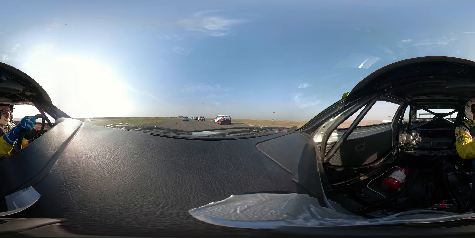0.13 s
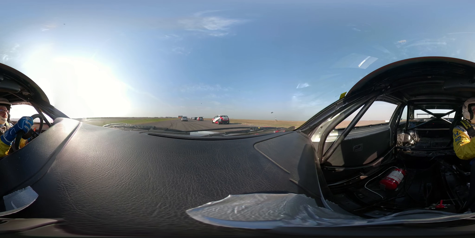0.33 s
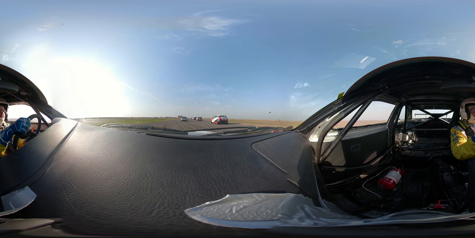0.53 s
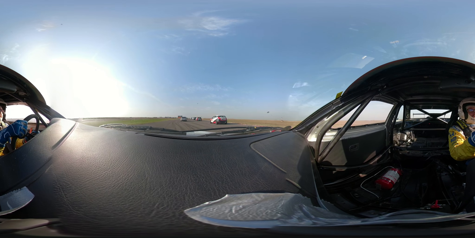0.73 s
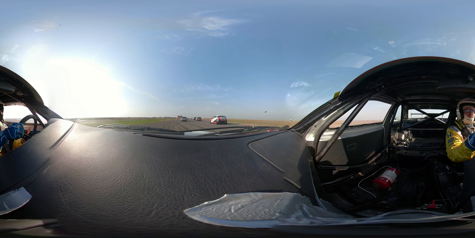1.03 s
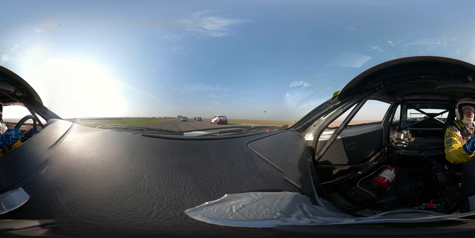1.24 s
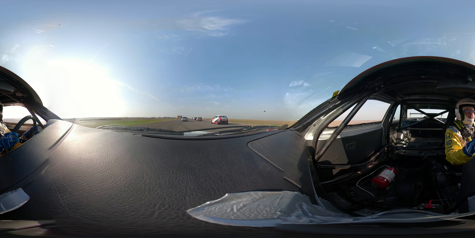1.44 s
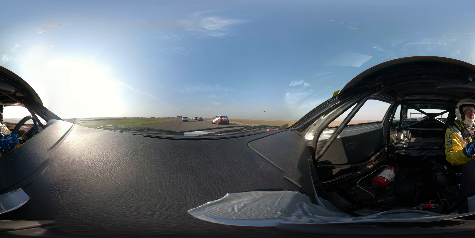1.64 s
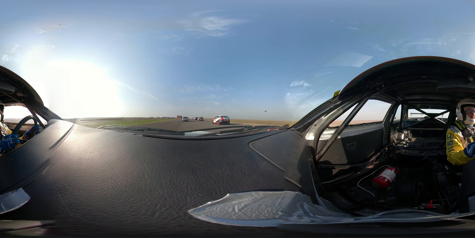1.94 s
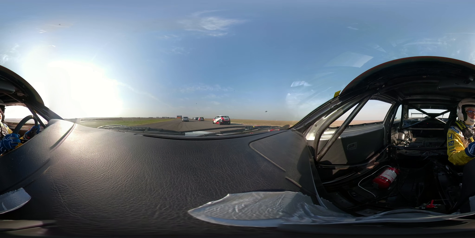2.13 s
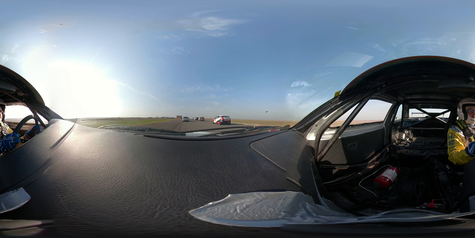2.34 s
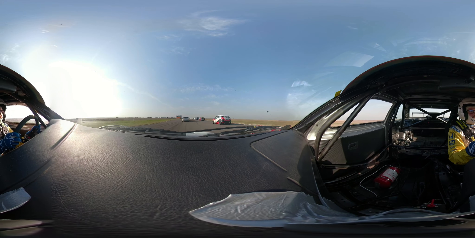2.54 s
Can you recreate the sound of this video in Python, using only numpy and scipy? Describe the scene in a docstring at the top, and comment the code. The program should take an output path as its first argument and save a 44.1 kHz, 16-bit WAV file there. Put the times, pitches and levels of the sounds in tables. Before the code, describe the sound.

Close in-car sound on a race track: a hard-working engine rises gradually in pitch with hissing intake and metallic valve clatter, then turns duller off throttle before picking up again, over low road and wind rumble.

```python
"""Inside a race car. After a short silence the sound fades in on a six-cylinder engine under load.
Its firing rate first dips, then climbs; the throttle lifts at 2 s and returns at 2.4 s.
The engine is tones at firing and cycle orders, combustion noise, valve clatter and intake hiss;
overtones, uneven orders and combustion noise sweep through fixed cabin resonances.
Shaped noise makes the road and wind rumble throughout; three decaying sines make chassis thuds."""
import sys
import numpy as np
from scipy import signal
from scipy.fft import rfft, irfft, next_fast_len
from scipy.io import wavfile
from scipy.ndimage import uniform_filter1d, map_coordinates

SR = 44100
rng = np.random.default_rng(int(sys.argv[2]) if len(sys.argv) > 2 else 0)


def boost(x):
    """Linear amplitude factor 10**(x/20) for a level x in decibels (scalar or array-like)."""
    u = np.asarray(x, float) / 20
    return 10 ** u


def output_pcm(signal):
    """Save a mono or channel-first signal as 16-bit PCM at the path in sys.argv[1].

    Samples are clipped to [-1, 1] before scaling.
    """
    pcm = np.clip(np.atleast_2d(signal).T, -1, 1) * 32767
    wavfile.write(sys.argv[1], SR, np.round(pcm).astype(np.int16))


N = 117747


def along(points, hz):
    """(Hz, dB) points on a log-frequency axis, -120 dB outside."""
    f, db = np.transpose(points)
    return np.interp(np.log(hz + 1), np.log(f + 1), db, -120, -120)


def unit(x):
    """Scaled to rms 1."""
    return x / np.sqrt(np.mean(x ** 2) + 1e-20)


def curves(rows):
    """One value per sample for each column after the time."""
    time_s, *columns = np.transpose(rows)
    return [np.interp(np.arange(N) / SR, time_s, column) for column in columns]


def wobble(knots_per_s):
    """A random curve, straight between its knots."""
    position = np.arange(N) * knots_per_s / SR
    return map_coordinates(rng.standard_normal(200), [position], order=1)


def filtered(x, response):
    """x times a response of frequency."""
    m = next_fast_len(N + 8192)
    return irfft(rfft(x, m) * response(np.fft.rfftfreq(m, 1 / SR)), m)[:N]


def rings(table):
    """A flat response with peaks and dips that add in dB; width is taken at half the dB height."""
    return lambda f: boost(sum(db / (1 + (2 * (f - hz) / width_hz) ** 2) for hz, width_hz, db in table))


def rush(spectrum, patchy_db):
    """Noise of rms 1, with gain patches random in time and frequency, shaped to a spectrum."""
    z = signal.stft(rng.standard_normal(N), nperseg=512)[2]
    field = uniform_filter1d(rng.standard_normal(z.shape), size=5, axis=0)
    field = uniform_filter1d(field, size=8, axis=1)
    x = signal.istft(z * boost(patchy_db * unit(field)), nperseg=512)[1][:N]
    return unit(filtered(x, lambda hz: boost(along(spectrum, hz))))


def orders(table, turns, shake_db, drift_turns, scatter_turns, sweep=0):
    """Tones at multiples of a rotation, unsteady in level and phase; little scatter makes pulses.

    sweep [turns per multiple squared] delays high multiples, so each pulse glides upward;
    it also makes them drift more."""
    total = 0
    for k, db in table:
        level = np.sqrt(2) * boost(db + shake_db * wobble(14))
        drift = (drift_turns + sweep * k * k / 55) * wobble(20)
        phase_turns = k * turns - sweep * k * k + scatter_turns * rng.random() + drift
        total = total - level * np.cos(2 * np.pi * phase_turns)
    return total


# low rumble: (time [s], level [dB])
RUMBLE_LEVEL = [(.08, -16.5), (.17, -25.5), (.45, -22.5), (.68, -25.5), (.84, -34), (1, -25.5),
                (1.2, -25.5), (1.5, -25), (1.9, -20), (2.1, -20.5), (2.4, -16.5), (2.65, -22.5)]
# rumble spectrum: (frequency [Hz], relative density [dB per Hz])
RUMBLE_SPECTRUM = [(12, -16.5), (25, -3.5), (40, -0.5), (60, 8.5), (92, -1), (130, -2), (210, -27),
                   (350, -90)]


def rumble():
    """Low road noise in lumps."""
    level_db, = curves(RUMBLE_LEVEL)
    return boost(level_db + 0.61 * wobble(21)) * rush(RUMBLE_SPECTRUM, patchy_db=-4.4)


# tyre and wind spectrum: (frequency [Hz], relative density [dB per Hz])
ROAR_SPECTRUM = [(60, -33.5), (100, -12.5), (160, 3.5), (210, 6), (290, -2.5), (350, -3.5), (534, -8),
                 (668, -14.5), (1190, -15), (2180, -32.5), (2600, -28.5), (4300, -45.5), (6800, -49.5),
                 (8000, -63.5), (9300, -62.5), (12000, -45), (15300, -59), (16000, -88)]
ROAR_MIN_DB, ROAR_FOLLOWS = -26, 0.13  # level at least throttle; share of the throttle swing


def roar(throttle_db):
    """Tyre and wind noise, steadier than the rumble."""
    level_db = ROAR_MIN_DB + ROAR_FOLLOWS * (throttle_db - throttle_db.min())
    return boost(level_db) * rush(ROAR_SPECTRUM, patchy_db=-0.55)


# jolts through the chassis: (time [s], level before onset and decay [dB], frequency [Hz])
THUDS = [(0.06, -8.5, 96.6), (1.769, -11.5, 52.9), (2.421, -10, 88)]
THUD_T60_S, THUD_ONSET_S = 0.28, 0.0058


def thuds():
    """Each jolt rings the floor pan briefly: a sine with a soft onset and exponential decay."""
    total = np.zeros(N)
    for start_s, db, hz in THUDS:
        since_s = np.clip(np.arange(N) / SR - start_s, 0, None)
        decay = boost(db - 60 * since_s / THUD_T60_S)
        onset = 1 - np.exp(-since_s / THUD_ONSET_S)
        total += decay * onset * np.sin(2 * np.pi * hz * since_s)
    return total


# air noise spectrum, intake and clatter: (frequency [Hz], relative density [dB per Hz])
HISS_SPECTRUM = [(900, -24), (1500, -8), (2200, -21), (2900, -9), (4200, -4.5), (5300, 6.5), (7300, 4.5),
                 (8000, -6), (8700, -14.5), (10000, -13.5), (12000, -11.5), (13500, -19.5), (15300, -24),
                 (16000, -61.5)]
# intake resonances: (frequency [Hz], width [Hz], gain over flat [dB])
INTAKE_RINGS = [(2600, 330, 9.5), (3620, 600, 11), (4600, 80, 4), (5110, 77, 6), (5500, 92, 4.5),
                (6080, 47, 9), (7090, 65, 7.5), (7020, 66, -2.5)]
# throttle, as intake hiss: (time [s], level before HISS_GAIN_DB [dB])
THROTTLE = [(0.08, -49), (0.14, -39), (0.36, -36.5), (0.42, -34.5), (0.79, -36.5), (0.82, -38.5),
            (1.03, -37.5), (1.21, -40.5), (1.9, -36.5), (2.07, -54.5), (2.4, -54), (2.44, -48), (2.63, -42),
            (2.65, -44)]
HISS_GAIN_DB = 0.84


def intake_hiss(throttle_db, beat, half_beat):
    """Air noise pulsing with the firings, through intake resonances, at the throttle's level."""
    pulse_db = 1.3 * beat + 0.43 * half_beat + 0.53 * wobble(29.852)
    air = rush(HISS_SPECTRUM, patchy_db=0.5) * boost(pulse_db)
    return boost(throttle_db + HISS_GAIN_DB) * unit(filtered(air, rings(INTAKE_RINGS)))


# valve clatter: (time [s], level [dB])
CLATTER_LEVEL = [(.08, -60), (.2, -47), (.5, -42), (.8, -45), (1.1, -48), (1.45, -44.5), (1.9, -41),
                 (2.02, -62), (2.65, -60)]
# valve cover resonances: (frequency [Hz], width [Hz], gain over flat [dB])
COVER_RINGS = [(3520, 89, 12), (3706, 160, 22.5)]
ODD_DB = -3  # half orders of the firing rate under whole ones


def valve_clatter(firings):
    """High multiples of half the firing rate, ringing the valve cover."""
    table = [(k, ODD_DB * (k % 2)) for k in range(25, 58)]
    ticks = orders(table, firings / 2, shake_db=3, drift_turns=0.06, scatter_turns=0.88)
    ringing = filtered(ticks, lambda f: boost(along(HISS_SPECTRUM, f)) * rings(COVER_RINGS)(f))
    return boost(curves(CLATTER_LEVEL)[0]) * unit(ringing)


# combustion noise spectrum: (frequency [Hz], relative density [dB per Hz])
COMBUSTION_SPECTRUM = [(150, -28.5), (300, 23.5), (600, -3.5), (1300, -12.5), (2000, -14), (4000, -22)]
PUFFS_MAX_DB, PUFFS_FOLLOW = -33.5, 0.6  # level into the cabin at most throttle; share of its swing


def combustion_puffs(throttle_db, beat, half_beat):
    """Combustion noise, swelling with each firing and with every second one."""
    level_db = PUFFS_MAX_DB + PUFFS_FOLLOW * (throttle_db - throttle_db.max())
    pulse = boost(2.3 * beat + 0.78 * half_beat)
    return boost(level_db) * unit(pulse * rush(COMBUSTION_SPECTRUM, patchy_db=-3.5))


# overtones of the firing rate: (multiple, relative level [dB])
OVERTONES = [(2, 0), (3, 1.5), (4, -12.5), (5, -20), (6, -21.5), (7, -26.5), (8, -29.5), (9, -28),
             (10, -30), (11, -29.5), (12, -35)]
# cycle orders between the overtones: (sixths of the firing rate, relative level [dB])
UNEVEN_HIGH = [(13, -21), (14, -19), (15, -10), (16, -30.5), (17, -10), (19, -27), (20, -19), (21, -16),
               (23, -27.5), (26, -35), (28, -30), (33, -32), (39, -32.5)]
SWEEP = 0.0349  # turns per multiple squared


def firing_overtones(firings):
    """Exhaust pulses, plus the high uneven orders that fall away with them off load."""
    pulses = orders(OVERTONES, firings, shake_db=1.2, drift_turns=0.02, scatter_turns=0.1, sweep=SWEEP)
    between = orders(UNEVEN_HIGH, firings / 6, shake_db=3.5, drift_turns=0.04, scatter_turns=1)
    return pulses + between


# low cycle orders: (sixths of the firing rate, relative level [dB])
UNEVEN = [(1, -4.5), (2, -7), (3, -1), (4, -1), (5, -1), (7, -12), (8, -19), (9, -7), (10, -11),
          (11, -19.5)]


def uneven_orders(firings):
    """Cylinders differ, so sixths of the firing rate sound."""
    return orders(UNEVEN, firings / 6, shake_db=1.8, drift_turns=0.06, scatter_turns=1)


def firing_tone(firings):
    """One tone at the firing rate."""
    return orders([(1, 0)], firings, shake_db=0.7, drift_turns=0.008, scatter_turns=0, sweep=SWEEP)


# firing rate: (time [s], rate [Hz])
FIRING_RATE = [(.08, 244.4), (.15, 238.1), (.24, 231.1), (.32, 234.2), (.41, 239.4), (.55, 240.3),
               (.7, 244.9), (.9, 250.3), (1.1, 256.9), (1.3, 261.6), (1.48, 267.5), (1.7, 271.8),
               (1.92, 275.1), (2.03, 272.3), (2.2, 275.1), (2.36, 276.3), (2.44, 265.7), (2.65, 274.5)]
# engine: (time [s], firing tone level [dB], overtone gain [dB], uneven order gain [dB])
ENGINE_LEVELS = [(.06, -28, -41, -26.5), (.15, -17.5, -36, -31), (.22, -14, -28, -26.5),
                 (.31, -12, -31.5, -26.5), (.4, -17, -29.5, -27), (.55, -18, -28.5, -24.5),
                 (.7, -16, -30.5, -26.5), (.82, -11.5, -32.5, -25), (1.03, -11, -36, -23.5),
                 (1.25, -13, -37.5, -27.5), (1.5, -14.5, -31.5, -29.5), (1.6, -19.5, -34.5, -27.5),
                 (1.66, -34, -31, -29), (1.78, -18.5, -27.5, -25.5), (1.94, -21.5, -30.5, -27.5),
                 (2.03, -16, -44, -31), (2.2, -24, -42, -33), (2.38, -22.5, -43.5, -29),
                 (2.44, -13, -44, -25.5), (2.56, -14, -40, -29.5), (2.65, -16.5, -39.5, -21.5)]
# cabin resonances and dead spots: (frequency [Hz], width [Hz], gain over flat [dB])
CABIN_RINGS = [(117.2, 16, 4), (183.6, 10, 5), (359.8, 12, 7), (400.6, 40, 4.5), (465, 13, -13),
               (490.6, 23.7, 7.5), (543.7, 30, 7.5), (566.4, 34, -14), (630, 21, 11), (679, 20, -10.5),
               (716, 32, -3), (741, 7.6, -18.5), (820, 35, -9.5), (950, 40, 0.5), (1036.5, 24, 2),
               (1098, 10, 9), (1169, 21, 15), (1225, 18, 17), (1260, 30, 16), (1387.5, 75, 14.5),
               (1618, 110, 6.5), (1832, 17, 15.5), (1964, 50, 10), (2027, 50, 10), (2361, 60, 13.5),
               (2525, 49, 12), (2580, 37, 2.5), (2688, 50, 10.5)]


def engine(throttle_db):
    """All engine parts share one firing count; overtones, uneven orders and puffs ring the cabin."""
    rate_hz, = curves(FIRING_RATE)
    tone_db, overtones_db, uneven_db = curves(ENGINE_LEVELS)
    firings = np.cumsum(rate_hz) / SR + 0.0064 * wobble(35)
    beat = np.cos(2 * np.pi * firings)
    half_beat = np.cos(np.pi * firings)
    tone = boost(tone_db) * firing_tone(firings)
    into_cabin = boost(overtones_db) * firing_overtones(firings)
    into_cabin += boost(uneven_db) * uneven_orders(firings)
    into_cabin += combustion_puffs(throttle_db, beat, half_beat)
    cabin = filtered(into_cabin, rings(CABIN_RINGS))
    hiss = intake_hiss(throttle_db, beat, half_beat)
    return tone + cabin + valve_clatter(firings) + hiss


def scene():
    """Road, wind, thuds and engine, summed to one channel."""
    throttle_db, = curves(THROTTLE)
    return (rumble() + roar(throttle_db) + thuds() + engine(throttle_db))[None]


def low_pass(x):
    """Removes everything above the highest recorded frequency."""
    return signal.sosfilt(signal.butter(12, 15290, fs=SR, output="sos"), x)


START_S, FADE_S, CEILING = 0.039, 0.027, 0.7


def record(dry):
    """Silence, a quick fade-in, and peaks bent softly under a ceiling."""
    fade = np.clip((np.arange(N) / SR - START_S) / FADE_S, 0, 1) ** 0.62
    mix = fade * dry
    mix = mix / (1 + np.abs(mix / CEILING) ** 6) ** (1 / 6)
    return low_pass(mix)


dry = scene()
out = record(dry)
output_pcm(out)
```